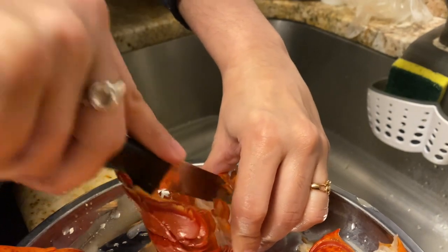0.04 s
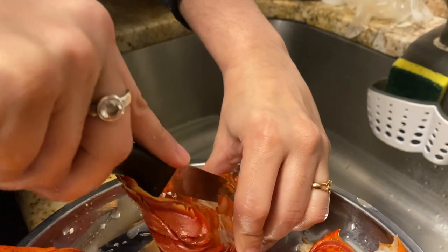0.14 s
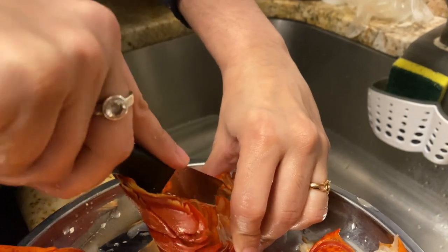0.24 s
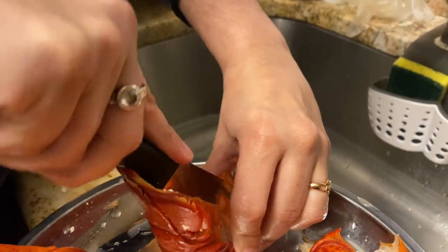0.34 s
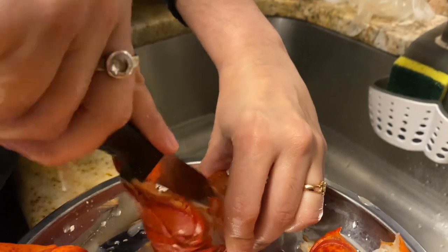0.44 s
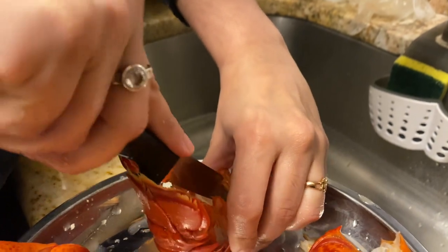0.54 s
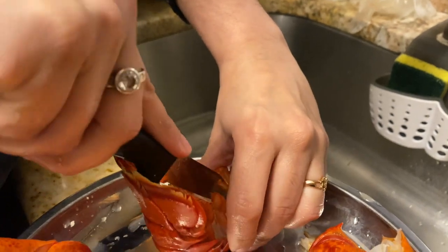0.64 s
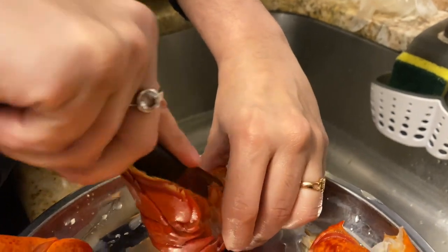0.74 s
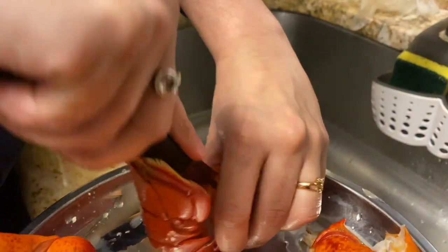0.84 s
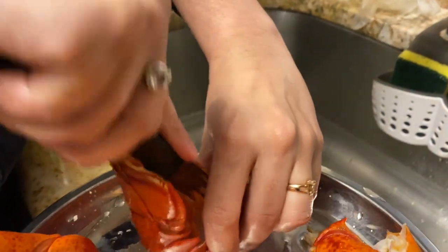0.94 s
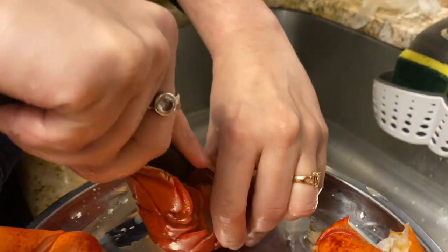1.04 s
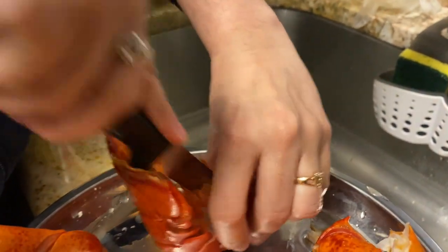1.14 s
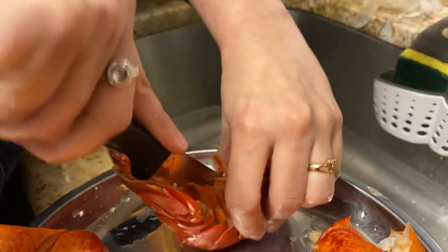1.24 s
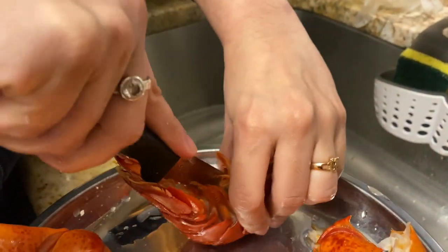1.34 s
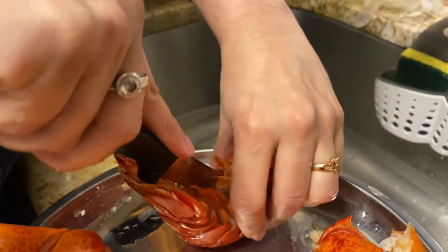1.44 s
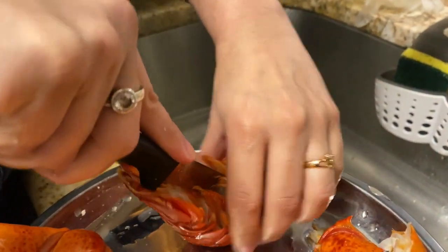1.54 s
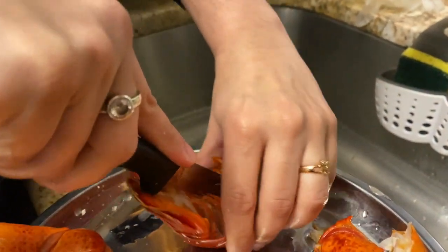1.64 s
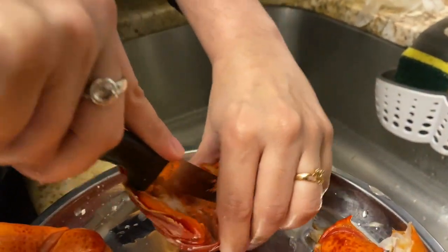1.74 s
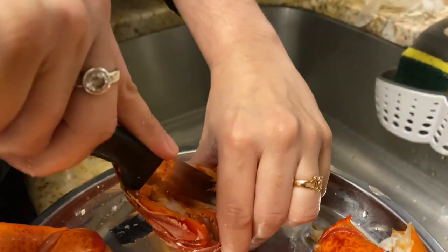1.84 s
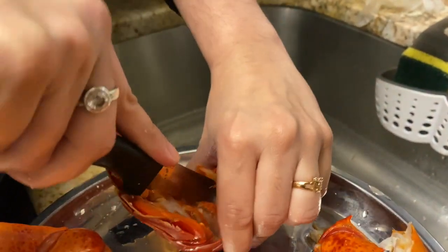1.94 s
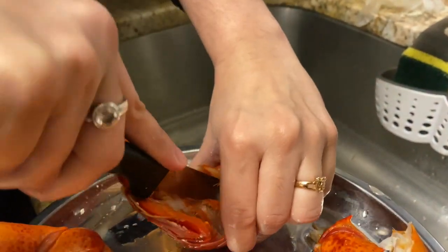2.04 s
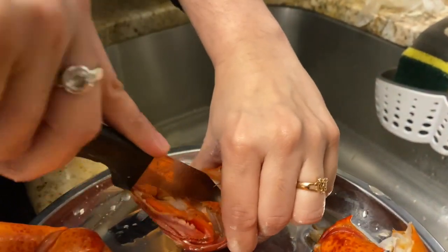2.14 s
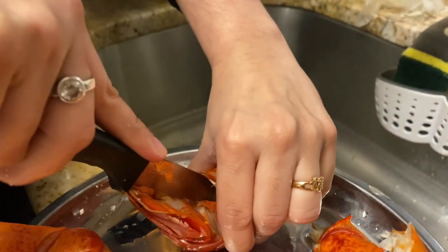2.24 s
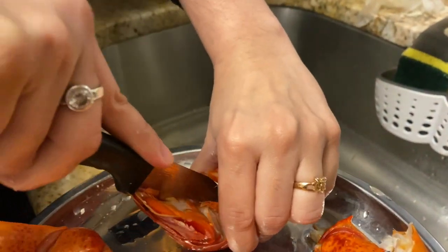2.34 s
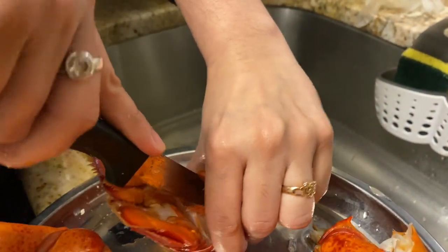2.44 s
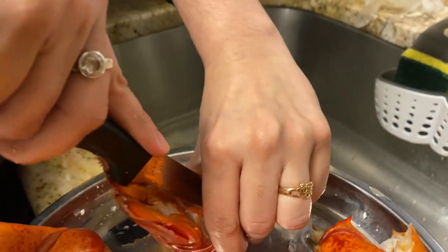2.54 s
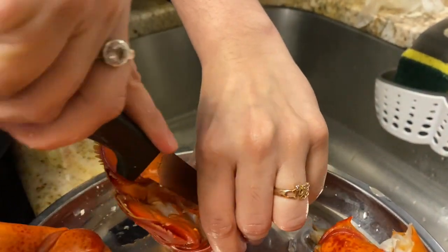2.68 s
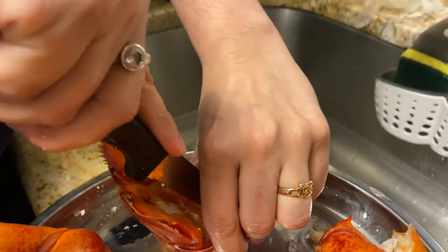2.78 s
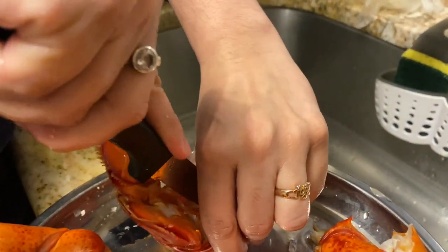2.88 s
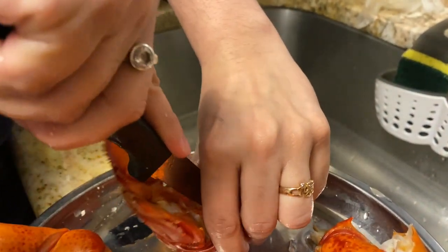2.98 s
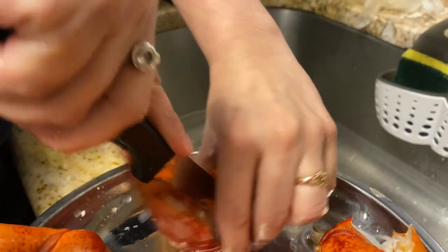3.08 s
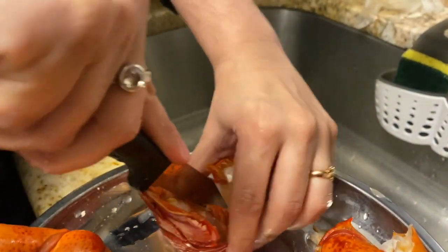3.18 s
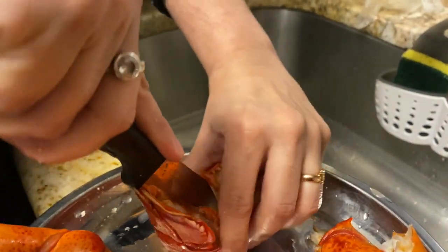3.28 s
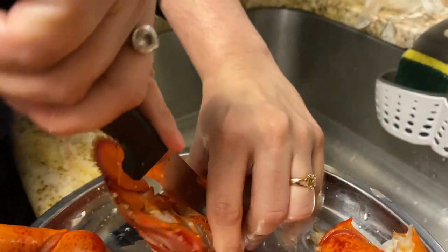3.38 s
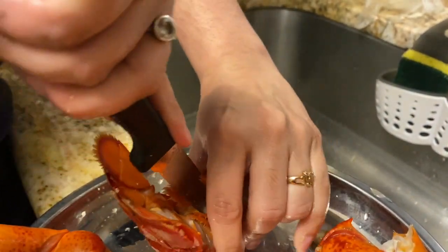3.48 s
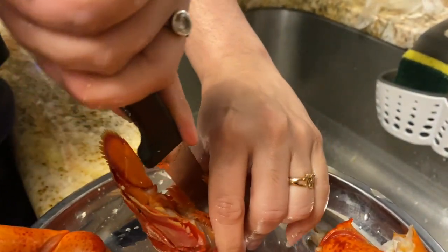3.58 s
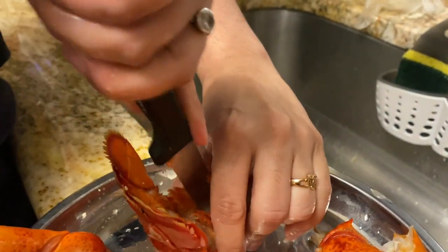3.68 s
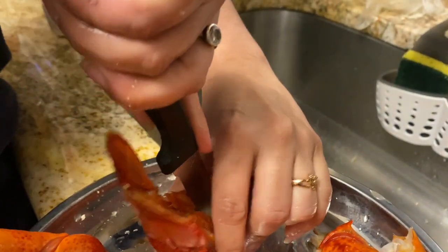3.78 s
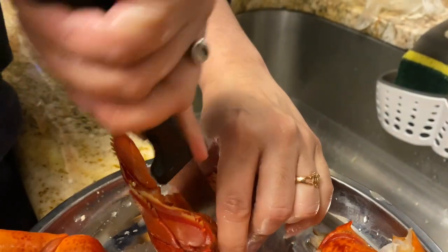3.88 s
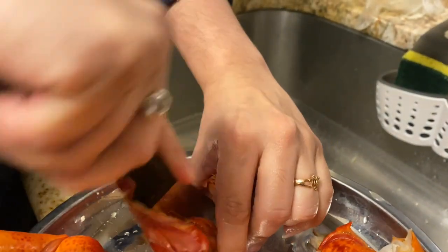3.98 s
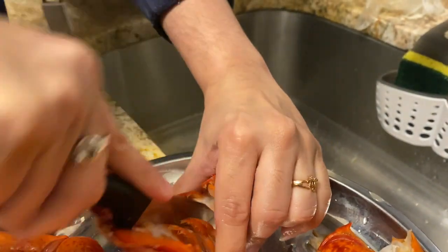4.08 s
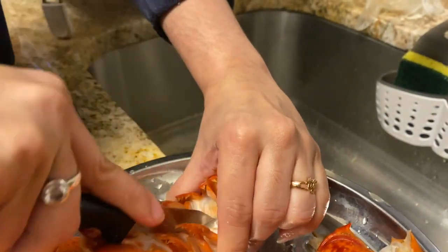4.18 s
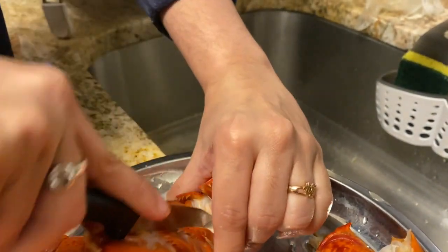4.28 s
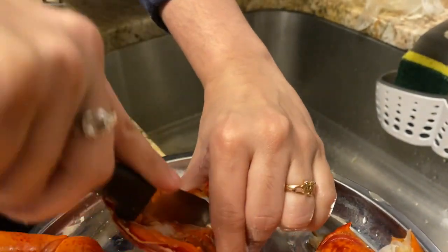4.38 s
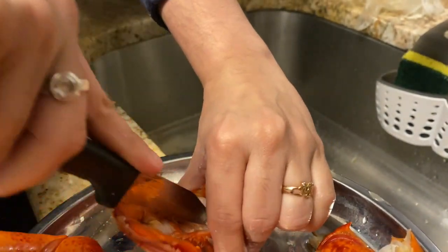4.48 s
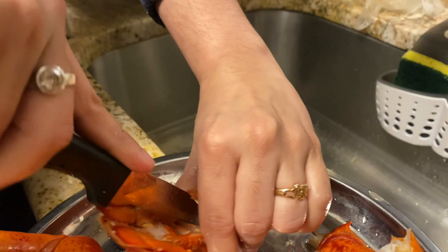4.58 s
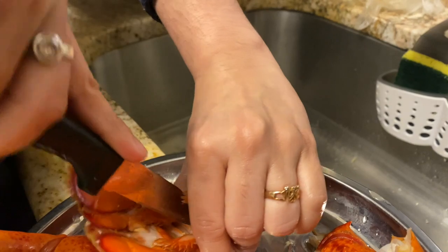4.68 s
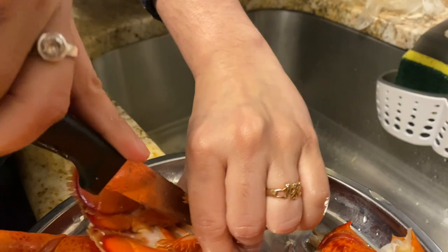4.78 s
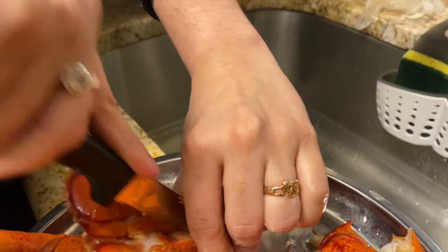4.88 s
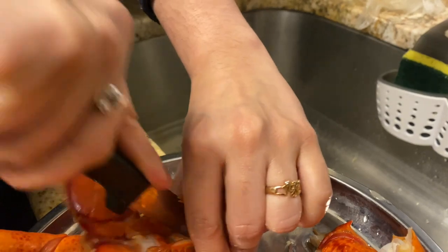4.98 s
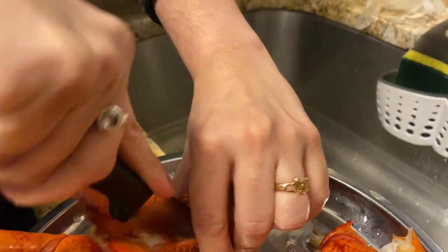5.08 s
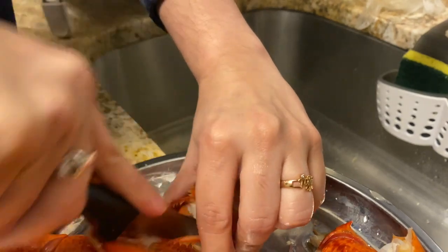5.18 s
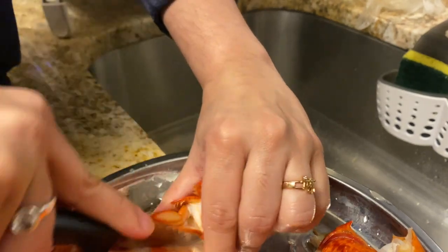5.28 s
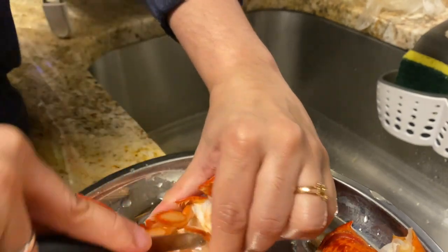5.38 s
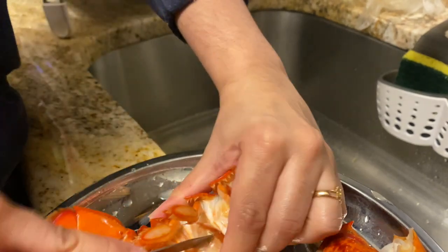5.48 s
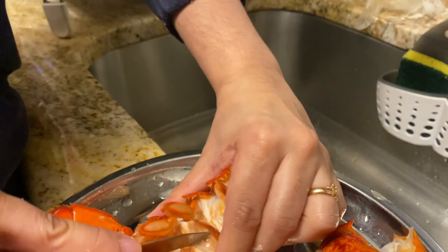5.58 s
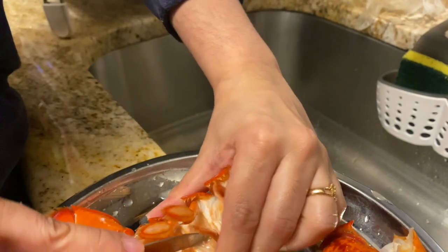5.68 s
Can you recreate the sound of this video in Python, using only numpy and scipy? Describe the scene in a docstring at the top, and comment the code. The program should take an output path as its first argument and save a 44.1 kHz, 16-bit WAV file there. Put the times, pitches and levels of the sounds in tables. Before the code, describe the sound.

A knife scrapes and pries at a lobster shell in a steel bowl, with small crackles, rasps and a few sharp, loud snaps.

```python
"""A kitchen knife scrapes and pries at a cooked lobster shell in a steel bowl that stands in a sink.
Over a steady room with refrigerator hum and a patchy wet rustle, small snaps and rasping strokes begin.
Snaps ring pieces of shell, crunches are dense fractures, strokes are friction noise in the shell's bands.
Hard pushes thud through low basin modes; the strongest cracks come near 1.2, 3.6 and 4.1 s.
Smaller snaps and crunches follow until all sound stops at 5.4 s; two microphone ports hear it in stereo."""
import sys
import numpy as np
from scipy import signal
from scipy.fft import rfft, irfft, next_fast_len
from scipy.io import wavfile
from scipy.ndimage import map_coordinates

SR = 44100
rng = np.random.default_rng(int(sys.argv[2]) if len(sys.argv) > 2 else 0)


def put_to_file(sound):
    """Save the sound as 16-bit audio at rate SR, in the file named by the first command-line argument."""
    columns = np.atleast_2d(sound).T  # one column per channel
    safe = np.clip(columns, -1, 1)
    whole_steps = np.round(safe * 32767)
    wavfile.write(sys.argv[1], SR, whole_steps.astype(np.int16))


N = 252252
TIME = np.arange(N) / SR
END_S = 5.412

# runs of small fractures as the shell gives way: start_s, length_s, level_db (before the layer gain),
# treble_db (relative to level)
CRUNCH_RUNS = [(0.225, 0.033, -58.5, -14), (0.341, 0.023, -44, -13), (0.437, 0.037, -51, -1),
               (0.628, 0.066, -39.5, -12), (0.817, 0.031, -58, -15), (0.876, 0.072, -42.5, -11.5),
               (1.068, 0.064, -44, -9), (1.138, 0.056, -51, -4), (1.162, 0.039, -32, -8),
               (1.202, 0.056, -49, -5), (1.433, .027, -60.5, -6), (1.901, 0.038, -56.5, -3),
               (2.016, 0.089, -50, -10.5), (2.623, 0.044, -55.5, -19), (3.014, 0.062, -61, -12),
               (3.136, 0.034, -59.5, -12), (3.615, 0.018, -44, -15), (3.628, 0.039, -31, -32),
               (4.057, 0.0062, -42.5, -10), (4.066, 0.023, -32, -11.5), (4.21, 0.025, -54.5, -2),
               (4.732, 0.06, -56.5, -9), (4.79, 0.099, -47.5, -9.5), (4.901, 0.051, -51.5, -2),
               (5.058, 0.05, -54, 0.5), (5.172, .035, -60.5, 3), (5.313, 0.049, -66, -3),
               (5.368, 0.038, -58.5, -5)]
# resonances of the hollow shell: pitch_hz, width_hz (before any narrowing), level_db (relative)
SHELL_MODES = [(518, 300, -6.5), (1137, 291, 1), (1550, 317, -3), (1900, 423, -7.5), (2280, 340, -2.5),
               (3055, 805, -9), (4370, 690, -12.5), (5800, 3200, -19)]


def amp(db):
    """Gain of a level in dB."""
    return 10 ** (np.asarray(db) / 20)


def unit(x):
    """x at rms 1."""
    return x / np.sqrt(np.mean(x ** 2) + 1e-20)


def along(points, hz, axis=1):
    """One column of (Hz, value, ..) points, interpolated on a log frequency axis."""
    table = np.transpose(points)
    return np.interp(np.log(hz + 1), np.log(table[0] + 1), table[axis])


def filtered(x, response):
    """x times a complex response of frequency, padded so that tails do not wrap round."""
    m = next_fast_len(N + SR // 4)
    spectrum = rfft(x, m) * response(np.fft.rfftfreq(m, 1 / SR))
    return irfft(spectrum, m)[..., :N]


def wobble(rate):
    """A smooth random curve, rate knots a second."""
    knots = rng.standard_normal(int(N * rate / SR) + 4)
    return map_coordinates(knots, [TIME * rate])


def runs(starts, lengths, values, lean, flat):
    """Sum of swells, one a run; lean under 1 rises faster than it falls, small flat widens the top."""
    out = np.zeros(N)
    for s, length, value in zip(starts, lengths, values):
        u = np.linspace(0, 1, round(length * SR))
        out[round(s * SR):][:len(u)] += value * np.abs(np.sin(np.pi * u ** lean)) ** flat
    return out


def mode(f, hz, width_hz):
    """One causal resonance of peak gain 1."""
    return 1j * f * width_hz / (hz * hz - f * f + 1j * f * width_hz)


def shell(f):
    """The hollow shell's resonances, neighbours opposed in sign."""
    modes = enumerate(SHELL_MODES)
    return sum((-1) ** k * amp(db) * mode(f, hz, width_hz) for k, (hz, width_hz, db) in modes)


def brittle(f):
    """The wide, dry tick of a fresh fracture."""
    return mode(f, 11000, 16000) ** 2


def grit(per_s, spread_db, hiss):
    """Random fractures of unequal size over fine friction noise, rms 1."""
    struck = rng.random(N) < per_s / SR
    size = amp(spread_db * np.minimum(rng.exponential(size=N), 3))
    ticks = struck * size * rng.standard_normal(N)
    return unit(unit(ticks) + hiss * rng.standard_normal(N))


def snaps():
    """A sharp break and milliseconds of splinters ring the broken piece and the whole shell, and tick."""
    # shell breaks: start_s, level_db (before the layer gains), pitch_hz of the piece,
    # treble_db (tick relative to level, before its gain)
    breaks = [(0.2141, -38.5, 1700, -21), (0.2321, -32, 1570, -44), (0.3491, -19.5, 1610, -16),
              (0.4465, -34, 1300, -27), (0.473, -40.5, 1290, -39), (0.5684, -35.5, 1490, -30),
              (0.6115, -36, 1340, -14.5), (0.6419, -22, 1600, -35.5), (0.6589, -17.5, 2290, -22),
              (0.6746, -26.5, 2460, -29.5), (0.7924, -35.5, 1270, -10), (0.833, -37, 2250, -2),
              (0.8846, -28.5, 2220, -42), (0.901, -27, 2150, -36.5), (0.9232, -19.5, 2430, -42),
              (1.0085, -37.5, 1590, -36), (1.052, -38.5, 1320, -31), (1.0814, -35, 1410, -22),
              (1.1681, -10.5, 2410, -13), (1.1859, -15.5, 2360, -8.5), (1.226, -29, 2260, -20),
              (1.2348, -20.5, 2314, -24), (1.4304, -39.5, 2380, -16), (1.737, -41.5, 1670, -34),
              (1.788, -41, 1180, -32), (1.839, -48.5, 1300, -30), (1.858, -44.5, 2000, -32),
              (1.9111, -38, 2080, -27), (1.9212, -38.5, 2200, -10), (2.026, -42, 1700, -27),
              (2.0384, -36, 1550, -29), (2.4838, -55, 2000, 1), (2.506, -58.5, 1980, 4),
              (2.5267, -49.5, 1270, -20.5), (2.6385, -25.5, 2000, -37), (2.974, -37.5, 1580, -52),
              (3.033, -43.5, 1500, -25), (3.0413, -30, 1077, -27), (3.125, -50.5, 1280, -26),
              (3.1391, -40.5, 1600, -25), (3.233, -51, 1690, -33), (3.2484, -36.5, 1640, -47),
              (3.2741, -39.5, 1230, -41), (3.301, -35.5, 1030, -28), (3.5839, -42, 1060, -12),
              (3.6297, -6.5, 1146, -42), (3.7276, -41.5, 1030, -37), (4.0673, -7, 2280, -14),
              (4.0754, -6, 2260, -8), (4.2704, -40, 1550, -39), (4.2856, -25.5, 2910, -29),
              (4.34, -44, 1375, -36), (4.358, -41.5, 1400, -36), (4.7547, -33, 4100, -30),
              (4.8226, -36, 2280, -30), (4.9082, -37.5, 1900, -28), (4.9221, -32, 1040, -16),
              (4.951, -49, 2200, 1), (4.9973, -34.5, 2230, -4), (5.0413, -42, 2340, -19),
              (5.06, -38, 2160, -31), (5.0738, -29, 2160, -19), (5.0776, -31.5, 2200, -5.5),
              (5.1862, -19.5, 2334, -34), (5.219, -36, 6040, -15), (5.3113, -44, 2680, -9),
              (5.3239, -39, 2650, -6.5), (5.378, -44, 2400, -13), (5.385, -42.5, 3090, 0.5)]
    piece, blows, ticks = np.zeros((3, N + SR))
    t = np.arange(SR // 25) / SR
    impulse = np.arange(len(t)) == SR // 3000  # the break itself, a third of a millisecond in
    for s, db, hz, treble_db in breaks + faint_snaps():
        start = round(s * SR)
        at = slice(start, start + len(t))
        splinters = rng.standard_normal((2, len(t))) * amp(-60 * t / .006) * np.minimum(t / 0.00025, 1)
        splinters /= np.linalg.norm(splinters, axis=1, keepdims=True)
        burst = .6 * splinters + [[.8], [.5]] * impulse
        t60_s = 11 / hz + 0.0032  # eleven cycles and a little more: high pieces die sooner
        ring = np.sin(2 * np.pi * hz * t) * np.minimum(t / 0.00091, 1)
        piece[at] += amp(db - 60 * t / t60_s) * ring
        blows[at] += amp(db) * burst[0]
        ticks[at] += amp(db + treble_db) * burst[1]
    hollow = amp(24.5) * filtered(blows[:N], shell)
    dry_ticks = amp(29) * filtered(ticks[:N], brittle)
    return amp(4.5) * piece[:N] + hollow + dry_ticks


def faint_snaps():
    """Small snaps at chance moments, as strong as the blade is pressing just then."""
    count, over_press_db, treble_db = 75, 5, -18.5
    middle_hz, spread_octaves = 1700, .4
    s, length, db, *_ = strokes()
    press = runs(s, length, amp(db), lean=.7, flat=0.57) + amp(-65.5)  # never quite released
    place, pitch = rng.random((count, 2)).T
    start_s = place * END_S
    level_db = 20 * np.log10(press[(start_s * SR).astype(int)]) + over_press_db
    pitch_hz = middle_hz * 2 ** (spread_octaves * (2 * pitch - 1))
    return [(s, db, hz, treble_db) for s, db, hz in zip(start_s, level_db, pitch_hz)]


def crunches():
    """Dense fractures that swell fast and thin out slowly, through the shell and as dry ticks."""
    s, length, db, treble_db = np.transpose(CRUNCH_RUNS)
    breaks = grit(per_s=900, spread_db=3.5, hiss=0.54)
    body_swell = runs(s, length, amp(db), lean=0.73, flat=1.0)
    body = filtered(body_swell * breaks, shell) / np.std(filtered(breaks, shell))
    tick_swell = runs(s, length, amp(db + treble_db), lean=0.57, flat=0.68)
    return amp(5.5) * (body + filtered(tick_swell * breaks, brittle))


def scrape():
    """The edge catches on rough shell in uneven slips; resonances near the part under it ring most."""
    smooth_db, rough_db = -24, -12  # treble of a stroke that glides on wet shell, and of one that catches
    blade_hz, blade_width_hz = 4100, 350  # the rubbed steel sings in one band
    shell_rings_db = 12  # lift of the rasp at the shell's resonances
    s, length, db, under_hz, treble_db = strokes()

    catch = np.clip((treble_db - smooth_db) / (rough_db - smooth_db), 0, 1)
    caught = runs(s, length, amp(db) * catch, lean=0.65, flat=0.47)
    pressed = runs(s, length, amp(db), lean=.7, flat=0.89)
    rough = np.clip(caught / (pressed + 1e-9), 0, 1)
    slips = unit(amp(2.2 * wobble(60)) * grit(per_s=920, spread_db=-1.0, hiss=1.6))
    glide = amp(1.3 * wobble(25)) * rng.standard_normal(N)
    rasp = np.sqrt(rough) * slips + np.sqrt(1 - rough) * glide

    ticks = runs(s, length, amp(db + treble_db), lean=.7, flat=0.51) * rasp
    out = filtered(ticks, brittle)
    steel = runs(s, length, amp(db), lean=.7, flat=1.0) * rasp
    out += filtered(steel, lambda f: mode(f, blade_hz, blade_width_hz) ** 2)
    for k, (hz, width_hz, level) in enumerate(SHELL_MODES):
        near = amp(-5) + np.exp(-(np.log(hz / under_hz) / 0.26) ** 2)
        swell = runs(s, length, amp(db + shell_rings_db + level) * near, lean=.7, flat=1.0)
        out += (-1) ** k * filtered(swell * rasp, lambda f: mode(f, hz, 0.55 * width_hz))
    return amp(2.0) * out


def strokes():
    """Every pass of the blade: strokes that often overlap into one longer drag, and slides after crunches."""
    # strokes along the shell: start_s, length_s, level_db (before the layer gains),
    # pitch_hz of the part under the edge, treble_db (relative to level)
    passes = [(0.294, 0.11, -53.5, 1480, -22), (0.55, 0.16, -58, 1400, -13),
              (0.737, 0.21, -55.5, 1600, -20), (0.994, 0.14, -52.5, 1450, -26),
              (1.553, 0.16, -53.5, 1530, -25.5), (1.678, 0.12, -52.5, 1770, -23.5),
              (1.828, 0.083, -56.5, 1420, -18), (2.18, 0.058, -65, 1700, -11),
              (3.23, 0.12, -61.5, 1610, -15), (3.323, .3, -67.5, 2200, -28.5),
              (4.015, 0.074, -60.5, 2200, -12), (4.216, 0.39, -60.5, 1430, -34),
              (4.343, 0.1, -49.5, 1940, -14), (4.425, 0.13, -52, 1670, -35),
              (4.505, 0.21, -54, 1140, -28.5), (4.993, 0.16, -74, 2210, -21)]
    # the freed blade slides on out of each crunch
    usual_crunch_db = -45
    slide_s, slide_db, slide_hz, slide_treble_db = .12, -64.5, 1900, -15  # after a usual crunch
    s_per_db, db_per_db = .004, 0.46  # a stronger crunch makes a longer, louder slide
    slides = []
    for s, length, db, _ in CRUNCH_RUNS:
        extra_db = db - usual_crunch_db
        slide_length = max(slide_s + s_per_db * extra_db, .02)
        slide_level = slide_db + db_per_db * extra_db
        slides.append((s + 0.78 * length, slide_length, slide_level, slide_hz, slide_treble_db))
    return np.transpose(passes + slides)


def thuds():
    """Soft pushes through the bowl swell into the low modes of the basin, varied a little each time."""
    # pushes: start_s, level_db (relative), upper_db (added to the modes above 130 Hz)
    pushes = [(.66, -34.5, -2.5), (0.909, -39.5, 5.5), (1.181, -30, -6), (1.235, -37, 5), (1.579, -44, 2),
              (2.03, -50, 4), (2.64, -32, -12), (3.645, -31, -1), (3.721, -38, -1), (4.08, -35.5, -3.5),
              (4.419, -50, 8.5), (4.83, -34, -3.5), (4.91, -36, -0.5), (5.38, -44.5, -0.5)]
    # basin modes: pitch_hz and level_db (both before random variation), t60_s
    basin = [(51, -11, 0.33), (104.9, -3, 0.28), (165.4, -4.5, .2), (276, -2, 0.19), (347.7, -11.5, 0.24)]
    rise_s = 0.015
    out = np.zeros((2, N + SR))
    t = np.arange(SR // 2) / SR
    rise = 1 - np.exp(-(t / rise_s) ** 2)
    for s, db, upper_db in pushes:
        for hz, level, t60 in basin:
            size, tune, phase = rng.standard_normal((3, 2, 1))  # one draw for each row
            mode_db = level + upper_db * (hz > 130) + 1.2 * size
            tone = np.sin(2 * np.pi * hz * (1 + 0.035 * tune) * t + 0.68 * phase)
            ring = amp(mode_db - 60 * t / t60) * tone
            out[:, round(s * SR):][:, :len(t)] += amp(db) * ring * rise
    return out[:, :N]


def echoes(x, life, delay):
    """Scattered answers, life times as long as the sink's; a new tail for every tenth of a second."""
    # ringing of the sink: pitch_hz, t60_s (before the life factor)
    sink_decay = [(300, 0.33), (1500, 0.081), (5000, 0.14), (15000, 0.03)]
    out, step = np.zeros((2, N + SR)), SR // 10
    for start in range(0, N, step):
        hz, t, z = signal.stft(rng.standard_normal((2, SR // 4)), SR, nperseg=128)
        decay = amp(-60 * t / (life * along(sink_decay, hz)[:, None]))
        tail = signal.istft(z * decay, SR, nperseg=128)[1]
        tail = tail / np.linalg.norm(tail[0])
        wet = signal.fftconvolve(x[None, start:start + step], tail, axes=1)
        out[:, start + round(delay * SR):][:, :wet.shape[1]] += wet
    return out[:, :N]


def rustle():
    """Wet fingers and shifting meat: a faint patchy fizz of grit that swells and sinks."""
    # loudness curve: time_s, level_db (before the random wobble)
    motion = [(0, -80), (.12, -80), (.54, -71.5), (1.04, -63), (1.45, -77.5), (1.89, -68.5), (2.2, -76),
              (2.55, -69), (2.84, -79), (3.11, -78), (3.55, -65), (3.76, -79), (4.05, -75), (4.24, -60.5),
              (4.41, -66.5), (4.71, -72.5), (4.94, -63), (5.4, -65.5)]
    # colour of the fizz: pitch_hz, level_db (per Hz, relative)
    wet_colour = [(500, -20.5), (1200, -5.5), (3000, -1.5), (6000, -8.5), (12000, -19.5), (16000, -15)]
    db = np.interp(TIME, *np.transpose(motion))
    fizz = np.array([grit(per_s=1100, spread_db=-1.0, hiss=0.53) for row in (0, 1)])
    coloured = unit(filtered(fizz, lambda f: amp(along(wet_colour, f))))
    return amp(db + 2.1 * wobble(25)) * coloured


def kitchen():
    """Room air as shaped noise, and a refrigerator's unsteady mains hum as a narrow band of noise."""
    # colour of the room air: pitch_hz, level_db (per Hz, relative)
    air_colour = [(25, -22), (60, -0.5), (90, -5.5), (160, -13), (280, -2.5), (380, -6), (450, -12.5),
                  (800, -19), (1400, -28), (2300, -37), (4500, -37.5), (7000, -41.5), (12000, -41),
                  (16000, -38.5)]
    noise = rng.standard_normal((2, 2, N))
    air = amp(-57) * unit(filtered(noise[0], lambda f: amp(along(air_colour, f))))
    hum = amp(-59) * unit(filtered(noise[1], lambda f: mode(f, 60, 5.9) ** 2))
    return air * amp(1.2 * wobble(4.6)) + hum


def scene():
    """Two rows: the sound field both ports share, and the scattered part in which they differ."""
    lobster = snaps() + crunches() + scrape()
    bowl = amp([[-14], [-3]]) * echoes(lobster, life=0.12, delay=0)
    sink = amp(-12) * echoes(lobster, life=1.0, delay=0.0028)
    direct = lobster * [[1], [0]]
    return direct + bowl + sink + thuds() + rustle() + kitchen()


def record(dry):
    """Ports colour and turn the field by frequency; sound stops at END_S, peaks bend, the top is cut."""
    # the pair of ports: pitch_hz, left_lead_rad, left_minus_right_db, likeness (0-1)
    ports = [(40, -0.7, 7.5, .7), (128, -1.55, -18.5, 0.4), (198, -2.5, -12, 0.7), (366, -2.5, -5, 0.93),
             (950, -4, -0.5, 0.96), (1400, -4, 3.5, 1), (2000, -6, 1, 0.6), (2834, -3.5, -0.5, 0.3),
             (4160, -5, -3, 1), (5500, -4.5, 3, 1), (5780, -5, 0.5, 0), (8360, -3, -2.5, 1),
             (9800, -3, 0.5, 1), (11450, -3.0, 1.5, .99), (13300, -2.3, -0.5, 0.6), (15400, -0.7, -1, 1)]
    ceiling, knee = .6, 3  # the input stage bends its highest peaks
    top_hz = 16900  # nothing passes above

    def port(side, part):
        def response(f):
            turn = np.arccos(np.clip(along(ports, f, axis=3), 0, 1)) / 2
            level = amp(side * along(ports, f, axis=2) / 2)
            lean = level * np.exp(side * .5j * along(ports, f))
            return lean * (side * np.sin(turn) if part else np.cos(turn))
        return response

    running = dry * np.clip((END_S - TIME) / .006, 0, 1)
    pair = np.array([sum(filtered(running[part], port(side, part)) for part in (0, 1))
                     for side in (1, -1)])  # left, right
    bent = pair / (1 + np.abs(pair / ceiling) ** knee) ** (1 / knee)
    return filtered(bent, lambda f: np.clip((top_hz - f) / 900, 0, 1) ** 2)


dry = scene()
out = record(dry)
put_to_file(out)
```